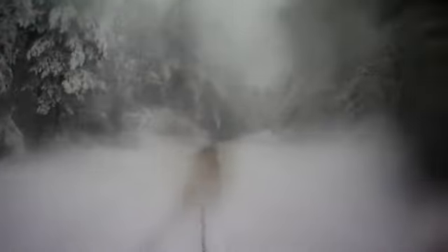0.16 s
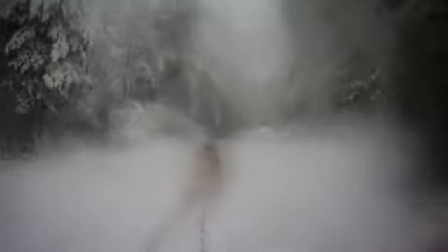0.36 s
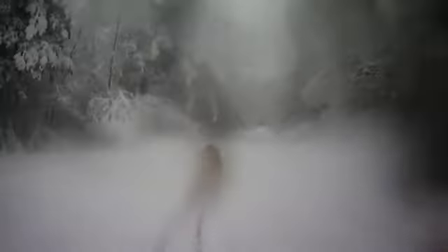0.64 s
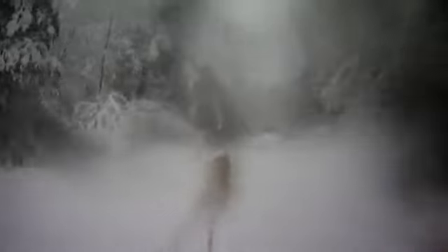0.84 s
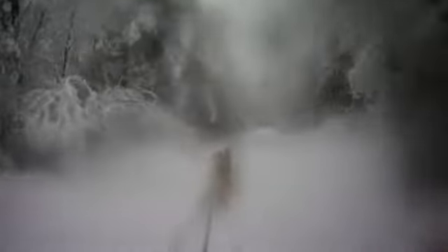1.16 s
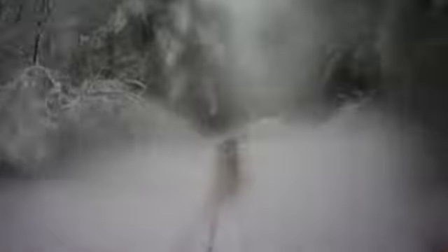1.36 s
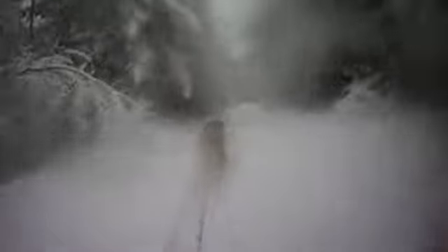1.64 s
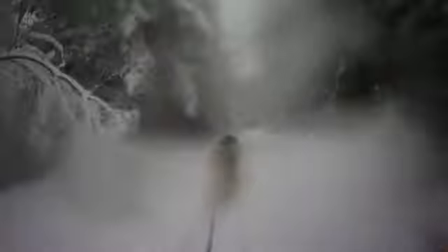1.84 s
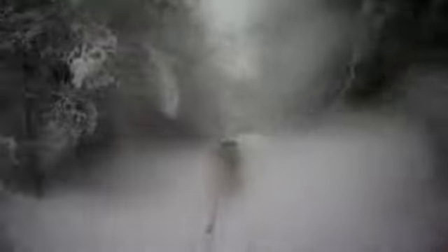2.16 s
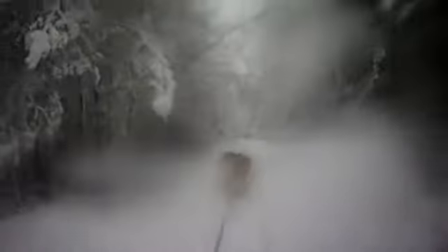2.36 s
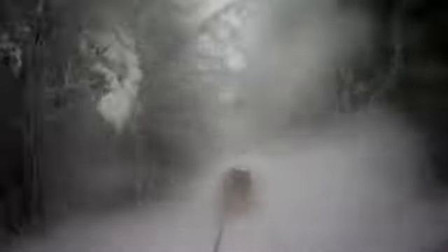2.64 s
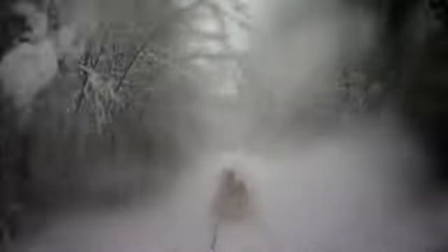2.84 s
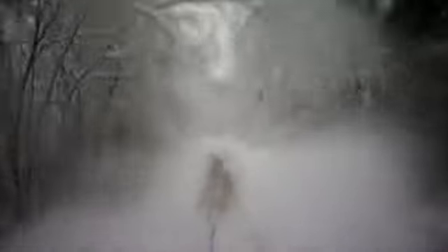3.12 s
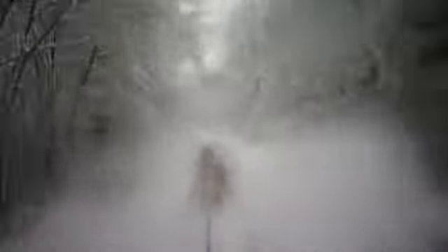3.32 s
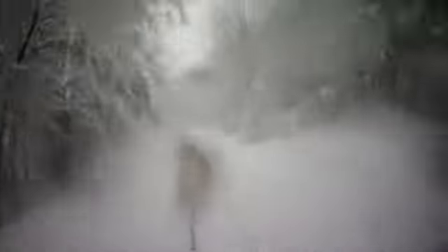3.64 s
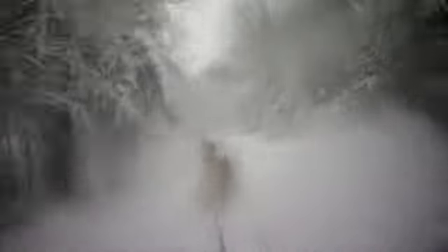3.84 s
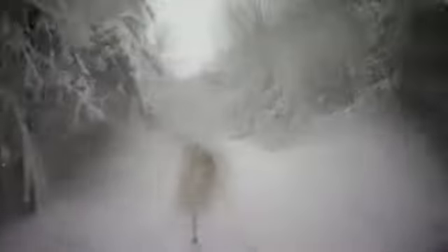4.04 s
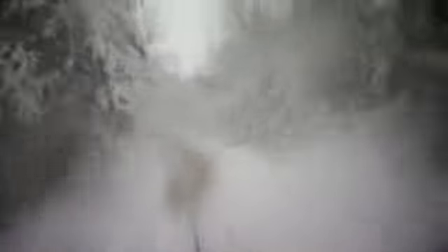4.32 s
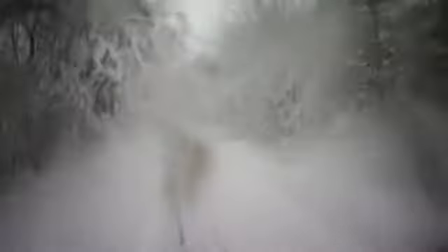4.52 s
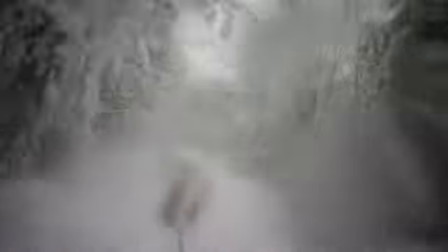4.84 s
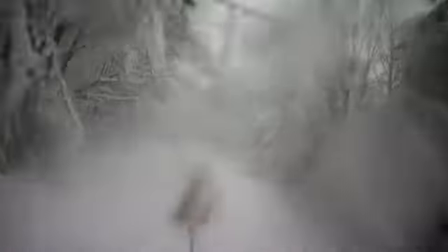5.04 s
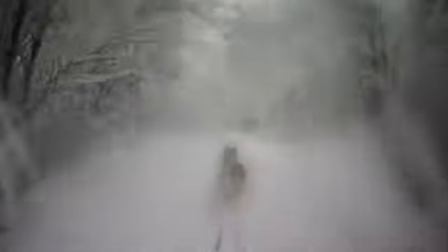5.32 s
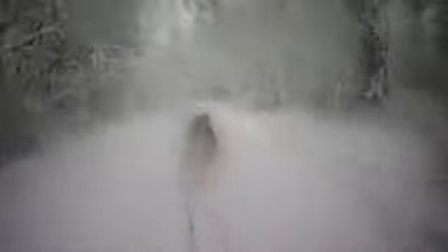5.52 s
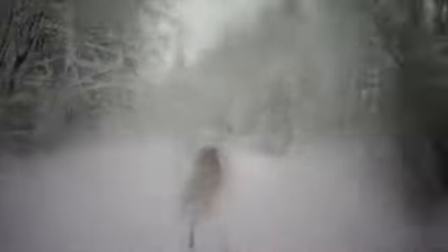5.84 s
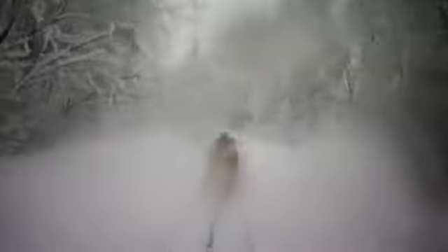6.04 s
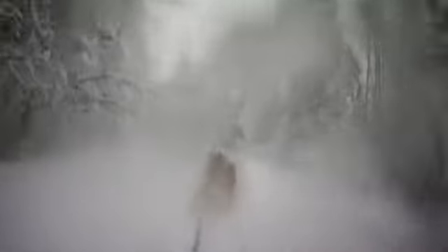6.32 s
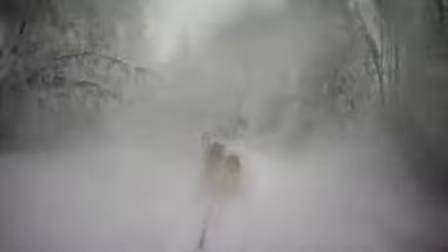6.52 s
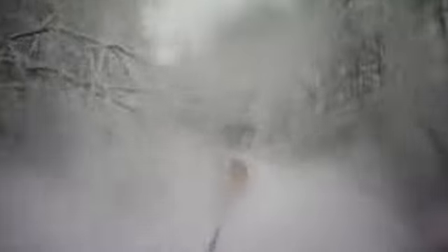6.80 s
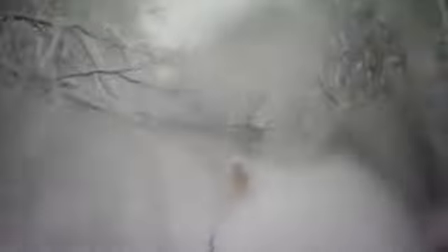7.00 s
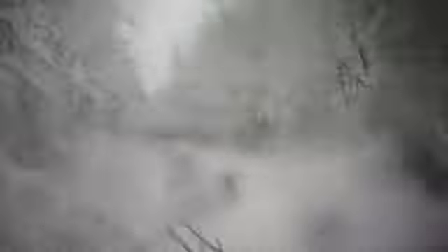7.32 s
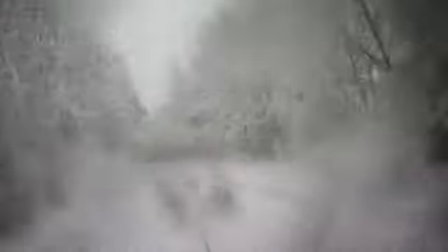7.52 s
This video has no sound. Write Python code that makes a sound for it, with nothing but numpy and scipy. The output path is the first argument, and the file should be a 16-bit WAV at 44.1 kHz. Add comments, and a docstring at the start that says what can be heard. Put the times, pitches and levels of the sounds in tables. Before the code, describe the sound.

A microphone sealed in a small plastic case rides along with a skier through forest powder. The ski hiss is narrow and hollow, rising and dipping with pressure, with deep wind rumble beneath. Irregular bumps bring rapid plastic rattles, low thumps and sprinkles of icy grains, densest around the middle. Near the end branches whip the case with sharp cracks and ringing midrange smacks that clip the microphone, before the hiss resumes.

```python
"""Skiing down a forest trail in deep powder, heard by one microphone inside a camera's plastic housing.
From the start the skis' hiss rings the hollow case, air rumbles past and crystals pepper the wall.
At each bump the case jolts, the mount knocks about 25 times a second and loosened snow ticks on the wall.
From about 3 s soft clumps of snow slap the case with short, damped rings.
Just after 7.2 s snowy twigs whip it: noise cracks and ringing walls that overload the microphone."""
import sys
import numpy as np
from scipy import signal
from scipy.fft import rfft, irfft
from scipy.io import wavfile
from scipy.ndimage import uniform_filter1d

SR = 44100
rng = np.random.default_rng(int(sys.argv[2]) if len(sys.argv) > 2 else 0)


def log_audio(samples):
    """Write samples as a 16-bit WAV file to the path given in sys.argv[1]."""
    # one column per channel
    frames = np.atleast_2d(samples).T
    # limit to full scale, then quantise
    limited = np.clip(frames, -1, 1)
    pcm = np.round(limited * 32767).astype(np.int16)
    wavfile.write(sys.argv[1], SR, pcm)


N = 337792
TIME = np.arange(N) / SR
FREQS = np.fft.rfftfreq(N, 1 / SR)

# Table levels are relative: each source adds its own trim, and some add random scatter.
# How hard the skis press through the powder: (time [s], hiss level [dB])
SKI_PRESSURE = [(0.0, -42), (0.47, -40), (1.43, -44), (1.68, -36.5), (1.82, -40), (2.38, -45), (2.6, -40),
                (2.86, -48), (3.36, -45), (3.5, -40), (3.88, -42.5), (4.07, -33.5), (4.18, -41),
                (4.45, -43), (4.64, -37), (5.05, -47), (5.38, -44), (5.56, -36.5), (5.85, -41.5),
                (6.2, -38), (6.43, -45), (6.52, -38), (6.98, -43), (7.2, -38), (7.66, -40)]
# Air space and walls of the case, driven by the skis: (centre [Hz], nominal width [Hz], level [dB])
CASE_RESONANCES = [(593, 154, -9.5), (954, 195, 0), (1384, 224, -2), (1764, 160, -7), (2056, 167, 2.5),
                   (2880, 290, -15), (3830, 210, -24), (7700, 100, -28)]
# Spectra of the moving air, deep rumble and quicker eddies: (frequency [Hz], density [dB])
RUMBLE_SPECTRUM = [(10, -25), (27, 2), (40, -2), (55, -5), (90, -11), (200, -27), (500, -46)]
BUFFET_SPECTRUM = [(30, -24), (70, 1), (120, -7.5), (200, -5), (320, -12), (700, 1), (2000, -88)]
# Spectra of the spray, its fine crystals, coarse grains and fizz: (frequency [Hz], density [dB])
CRYSTAL_SPECTRUM = [(3000, -23), (7000, -12), (8500, 0), (11000, 8), (14500, -3.5), (16000, -29)]
GRIT_SPECTRUM = [(1500, -11), (3000, -10), (3600, -6), (5100, -2), (6400, -10), (9000, -4), (15000, -9.5)]
FIZZ_SPECTRUM = [(2000, -19.5), (3700, 20), (5000, -6.5), (7300, -23), (7900, 18.5), (9000, -19),
                 (10800, 7.5), (13000, 6.5), (15200, 4.5), (16000, -18.5)]
# Bumps that set the mount rattling: (first knock [s], last knock [s], first knock level [dB],
# last knock level [dB], loosened snow [dB against the knocks])
RATTLING_BUMPS = [(0.022, 0.181, -23, -24, -3), (0.454, 0.487, -26.5, -20, -14),
                  (0.645, 0.645, -30, -30, -10), (0.722, 0.753, -20, -21, -9),
                  (0.792, 0.831, -22.5, -27.5, -9), (0.877, 0.957, -18.5, -20.5, -10),
                  (0.999, 1.118, -23, -30.5, -13), (1.668, 1.710, -22, -22.5, -16),
                  (1.883, 1.949, -33, -29, -14), (2.103, 2.205, -23, -27.5, -11),
                  (2.482, 2.523, -12.5, -14, -12), (2.557, 2.678, -25, -24, -12),
                  (2.744, 2.744, -26, -26, -2), (3.308, 3.308, -32, -32, -1),
                  (3.480, 3.519, -15, -14.5, -7.5), (3.564, 3.643, -14.5, -21, -6),
                  (3.688, 3.800, -18, -29, -2), (3.838, 3.911, -25.5, -26, -11),
                  (3.954, 3.988, -18.5, -25, -10), (4.139, 4.177, -23.5, -21.5, -12),
                  (4.222, 4.257, -17, -18, -10), (4.303, 4.349, -14.5, -14, -7),
                  (4.388, 4.468, -19, -22, -1), (4.513, 4.513, -17, -17, -13),
                  (4.611, 4.685, -17.5, -18.5, -11), (4.732, 4.764, -17.5, -24, -10),
                  (5.146, 5.146, -34, -34, -2), (5.316, 5.316, -29, -29, -7), (5.524, 5.657, -15, -25, -9),
                  (5.939, 5.989, -27.5, -31.5, -10), (6.223, 6.387, -21.5, -21, -3),
                  (6.506, 6.588, -19.5, -20.5, -8), (6.657, 6.733, -20, -30, -10),
                  (6.870, 6.870, -31, -31, -8), (7.173, 7.173, -26, -26, -13),
                  (7.496, 7.496, -23.5, -23.5, 0), (7.653, 7.653, -23.5, -23.5, -9)]
# Strong jolts from the ground: (time [s], level [dB], pitch [Hz])
GROUND_JOLTS = [(0.865, -23, 104), (1.596, -27, 186), (1.641, -25, 110), (3.678, -17, 89),
                (5.495, -15.5, 105), (6.105, -27, 120)]
# What a knock of the mount rings: (nominal pitch [Hz], nominal width [Hz], level [dB])
MOUNT_RESONANCES = [(76, 123, 6), (437, 108, 8.5), (584, 176, 5.5), (950, 77, 11), (1617, 192, 7.5),
                    (1974, 47, 5), (2860, 150, -15.5), (3757, 130, 1), (4110, 220, -11), (4980, 210, -12)]
# Snow loosened by a knock lands in two lots: (mean delay [s], scatter of the delay [s], level [dB])
SNOW_LANDINGS = [(.014, .0014, -2.5), (.028, .004, -12)]
# Single icy grains that hit the case: (time [s], level [dB])
ICY_GRAINS = [(0.501, -21), (0.768, -14), (0.891, -19), (0.968, -18), (1.026, -25), (1.642, -26),
              (1.651, -23.5), (2.462, -24), (2.532, -23), (3.326, -25), (3.471, -24), (3.589, -20.5),
              (3.704, -21), (3.737, -18), (3.856, -25), (3.925, -20.5), (3.964, -24), (4.053, -25),
              (4.270, -17.5), (4.414, -19.5), (4.441, -22), (5.391, -29), (5.558, -24), (5.920, -32),
              (6.233, -24), (6.316, -17.5), (6.333, -22), (6.341, -22), (6.370, -20.5), (6.747, -24)]
# Spectrum of the icy ticks: (frequency [Hz], density [dB])
TICK_SPECTRUM = [(300, -23), (1000, -5.5), (2000, -1.5), (3000, -17), (3600, 1), (5000, -7.5), (6300, -8.5),
                 (8500, 1.5), (11000, 0), (15000, -1.5), (17000, -28.5)]
# Soft clumps of snow that slap the case: (time [s], level [dB], ring pitch [Hz])
SNOW_CLUMPS = [(3.013, -29, 1920), (3.449, -26.5, 1030), (4.067, -24.5, 1950), (4.269, -24, 1750),
               (4.569, -21, 1050), (5.541, -25.5, 1000), (5.551, -31, 1800), (5.631, -31, 1960)]
# Twig strikes: (time [s], ring level [dB], ring pitch [Hz], crack level [dB])
TWIG_STRIKES = [(7.2479, -1, 2000, 2), (7.2737, 9, 1850, 2.5), (7.2920, 8, 2188, 4), (7.3170, 0, 1324, -20),
                (7.3300, -3, 1080, -11), (7.3360, -2, 976, -14), (7.3462, 2, 2050, -9),
                (7.3785, 9, 2086, 7), (7.3880, 2, 1960, -13), (7.4022, 4, 2010, -19),
                (7.4161, 6, 1956, -11), (7.4235, 4, 2000, -11), (7.4348, 7, 1930, -13),
                (7.4589, -15, 1310, -5)]
# Spectrum of the twigs' cracks: (frequency [Hz], density [dB])
CRACK_SPECTRUM = [(300, -19), (1000, 5), (3000, 8), (5300, 4.5), (7000, 2), (9500, 8), (11200, 10.5),
                  (14000, 4.5), (16000, -8)]

# Steady levels while gliding [dB]
GLIDE_RUMBLE_DB, GLIDE_BUFFET_DB, GLIDE_SPRAY_DB = -44, -53, -63.5
AIR_FOLLOWS_HISS = .6  # dB of air noise per dB of ski hiss
# Low noise at a middling knock [dB], and its growth [dB per dB of knock]
SHAKE_RUMBLE_DB, SHAKE_BUFFET_DB, SHAKE_GROWTH = -38, -45, .6
# Pressed this hard the skis throw spray too [dB]; the growth is in dB per dB of hiss
CARVE_HISS_DB, CARVE_SPRAY_DB, CARVE_GROWTH = -35, -53, 4.5
SNOW_SPRAY_DB, TWIG_SPRAY_DB = -25.5, -47.5  # spray against the loosened snow and the twig rings
RATTLE_S = .039  # about one swing of the mount
JOLT_LEAD_S, JOLT_DB, JOLT_HZ = .010, -9, 85  # small jolt before a knock: dB against it, median pitch
LANDING_SCATTER_DB = 2.5
SOONER_S_PER_DB = .0005  # a harder knock flings the snow faster
TWIG_BOUNCE_S, TWIG_BOUNCE_DB = .0058, -8  # a twig springs back and touches once more
TOP_HZ = 15700  # upper edge of the microphone's band


def undb(db):
    """Decibels to gain."""
    return 10 ** (np.asarray(db) / 20)


def power_sum(*levels_db):
    """Level of unrelated sounds together."""
    return 10 * np.log10(sum(undb(db) ** 2 for db in levels_db))


def unit(x):
    """Scale to rms 1."""
    return x / np.sqrt(np.mean(x ** 2))


def unit_energy(x):
    """Scale a short sound to energy 1."""
    return x / np.linalg.norm(x)


def curves(table):
    """Each column of a time table, sample by sample."""
    s, *columns = np.transpose(table)
    return [np.interp(TIME, s, column) for column in columns]


def swell(times, levels_db, hold_s, rise_db_per_s, fall_db_per_s):
    """A level in dB that rises to each event, holds briefly and falls away."""
    coarse = TIME[::64]
    since = coarse - times[:, None]
    before = rise_db_per_s * np.maximum(-since, 0)
    after = fall_db_per_s * np.maximum(since - hold_s, 0)
    return np.interp(TIME, coarse, np.max(levels_db[:, None] - before - after, axis=0))


def walk(rate):
    """Smooth random wandering with spread 1, in about `rate` steps a second."""
    k = int(SR / rate)
    steps = np.repeat(rng.standard_normal(N // k + 1), k)
    smooth = uniform_filter1d(uniform_filter1d(steps, k), k)
    return unit(smooth[:N])


def add(track, s, sound):
    """Mix a short sound in at time s."""
    start = int(np.clip(s * SR, 0, N - 1))
    track[start:start + len(sound)] += sound[:N - start]


def colour(x, points):
    """Causal filter of unit power gain with the given (Hz, dB) shape."""
    hz, db = np.transpose(points)
    gain = unit(undb(np.interp(np.log(FREQS + 1), np.log(hz), db)))
    # Folding the cepstrum onto positive times gives minimum phase
    cepstrum = irfft(np.log(gain), N)
    cepstrum[1:N // 2] *= 2
    cepstrum[N // 2 + 1:] = 0
    return irfft(rfft(x) * np.exp(rfft(cepstrum)), N)


def resonate(x, hz, width):
    """One resonance, gain 1 at its centre."""
    return signal.lfilter(*signal.iirpeak(hz, hz / width, fs=SR), x)


def grains(per_s, spread_db):
    """Random impulses, many weak and a few strong."""
    size = undb(spread_db * np.minimum(rng.exponential(size=N), 4))
    landed = rng.random(N) < per_s / SR
    return unit(landed * size * rng.choice([-1, 1], N))


def burst(t, rise_s, decay_s):
    """A brief crush of noise that swells and dies, with unit energy."""
    envelope = (1 - np.exp(-t / rise_s)) ** 2 * np.exp(-t / decay_s)
    return unit_energy(rng.standard_normal(len(t)) * envelope)


def skis(hiss_db):
    """Powder shears under the skis; the case passes mostly its own resonances, each wavering a little."""
    shear = rng.standard_normal(N) + 1.04 * grains(per_s=1500, spread_db=6.0)
    hollow = np.zeros(N)
    for k, (hz, nominal_width, db) in enumerate(CASE_RESONANCES):
        width = 1.09 * nominal_width
        waver = undb(1.4 * walk(22))
        ringing = resonate(resonate(shear, hz, width), hz, width)
        hollow += (-1) ** k * undb(db) * waver * ringing  # neighbours in opposite polarity
    # A little hiss gets straight through the seams
    leak = resonate(rng.standard_normal(N), 1300, 1500)
    flutter_db = 0.8 * walk(30)
    return (unit(hollow) + undb(-36) * unit(leak)) * undb(hiss_db + 1.2 + flutter_db)


def air(rumble_db, buffet_db):
    """A deep rumble of moving air and quicker low buffeting, both swelling around each knock."""
    rumble = colour(rng.standard_normal(N), RUMBLE_SPECTRUM) * undb(rumble_db - .7)
    gusts = undb(3 * walk(40))
    buffet = colour(rng.standard_normal(N), BUFFET_SPECTRUM) * gusts * undb(buffet_db - 1)
    return rumble + buffet


def crackle(per_s, spread_db, decay_s):
    """Each grain bursts into its own tiny puff of noise."""
    impacts = grains(per_s, spread_db) ** 2 + 1e-12
    energy = signal.lfilter([1], [1, -np.exp(-2 / (decay_s * SR))], impacts)
    return unit(np.sqrt(energy) * rng.standard_normal(N))


def spray(spray_db):
    """Many fine crystals and fewer coarse grains pepper the case over a smooth fizz."""
    fine = colour(crackle(per_s=170, spread_db=5.5, decay_s=.0008), CRYSTAL_SPECTRUM)
    coarse = colour(crackle(per_s=60, spread_db=5, decay_s=.0009), GRIT_SPECTRUM)
    fizz = colour(rng.standard_normal(N), FIZZ_SPECTRUM) * undb(-1.5 + 2.6 * walk(60))
    return (fizz + undb(5) * fine + undb(2.5) * coarse) * undb(spray_db)


def ride(knocks):
    """Hiss, air and spray: air follows the skis and the low end swells around each knock; carving, bumps and
    twigs throw snow."""
    hiss_db, = curves(SKI_PRESSURE)
    knock_s, knock_db, snow_db = knocks.T
    twig_s, twig_db = np.transpose(TWIG_STRIKES)[:2]

    shake_peaks_db = SHAKE_GROWTH * (knock_db - knock_db.mean())
    shake_db = swell(knock_s, shake_peaks_db, hold_s=.02, rise_db_per_s=190, fall_db_per_s=200)
    speed_db = AIR_FOLLOWS_HISS * (hiss_db - hiss_db.mean())
    rumble_db = power_sum(GLIDE_RUMBLE_DB + speed_db, SHAKE_RUMBLE_DB + shake_db)
    buffet_db = power_sum(GLIDE_BUFFET_DB + speed_db, SHAKE_BUFFET_DB + shake_db)

    carve_db = CARVE_SPRAY_DB + CARVE_GROWTH * (hiss_db - CARVE_HISS_DB)
    thrown_db = swell(knock_s, snow_db, hold_s=.02, rise_db_per_s=320, fall_db_per_s=200)
    shed_db = swell(twig_s, twig_db, hold_s=.03, rise_db_per_s=500, fall_db_per_s=130)
    spray_db = power_sum(GLIDE_SPRAY_DB, carve_db, SNOW_SPRAY_DB + thrown_db, TWIG_SPRAY_DB + shed_db)
    return skis(hiss_db) + air(rumble_db, buffet_db) + spray(spray_db)


def knock_series():
    """The mount knocks once a swing for as long as a bump lasts: rows of (s, level dB, snow dB)."""
    rows = []
    for first_s, last_s, first_db, last_db, snow_db in RATTLING_BUMPS:
        swings = round(abs(last_s - first_s) / RATTLE_S)
        series = np.linspace((first_s, first_db), (last_s, last_db), swings + 1)
        rows += [(s, db, db + snow_db) for s, db in series]
    return np.array(rows)


def jolts(knocks):
    """A bump shakes the whole case in a short low pulse, with a small one just before each knock."""
    out, t = np.zeros(N), TIME[:4096]
    shakes = list(GROUND_JOLTS)
    for s, knock_db, _ in knocks:
        hz = JOLT_HZ * np.exp(.3 * rng.standard_normal())
        shakes.append((s - JOLT_LEAD_S, knock_db + JOLT_DB, hz))
    envelope = (1 - np.exp(-t / 0.0029)) * np.exp(-t / 0.0081)
    for s, level_db, hz in shakes:
        add(out, s, np.sin(2 * np.pi * hz * t) * envelope * undb(level_db + 0.5))
    return out


def rattle(knocks):
    """Every knock rings the same short modes; harder knocks are brighter, deader and scuff more."""
    out, t = np.zeros(N), TIME[:2048]
    hz, width, db = np.transpose(MOUNT_RESONANCES)[:, :, None]
    # Plastic on plastic passes little treble
    soft_stop = signal.butter(10, 5450, fs=SR, output="sos")
    scuff_filter = signal.butter(1, 7000, fs=SR, output="sos")
    for s, level_db, _ in knocks:
        force = (level_db + 22) / 10
        detune, scatter = rng.standard_normal((2, len(hz), 1))
        brightness_db = 2.0 * force * np.log2(hz / 1000)
        weight = width * undb(db + 0.94 * scatter + brightness_db)
        damping = np.pi * width * (1 + 1.04 * max(force - .4, 0))
        pitch = hz * (1 + .01 * detune)
        modes = weight * np.exp(-damping * t) * np.cos(2 * np.pi * pitch * t)
        ring = signal.sosfilt(soft_stop, np.sum(modes, axis=0))
        for slow_hz in (1100, 1900):  # all-pass: the mount carries some pitches later than others
            ring = ring - 2 * resonate(ring, slow_hz, 1000)
        scuff = signal.sosfilt(scuff_filter, burst(t, 0.00026, 0.0016))
        knock = (unit_energy(ring) + scuff * undb(-9.5 + 8.4 * force)) * undb(level_db + 24.5)
        add(out, s, knock)
        # It bounces off the opposite stop
        bounce_s = 0.002186 * (1 + 0.05 * rng.standard_normal())
        add(out, s + bounce_s, -undb(-14) * knock)
    return out


def ticks(knocks):
    """Icy grains shatter on the case in about a millisecond; most land after a knock shook them loose."""
    out, t = np.zeros(N), TIME[:1024]
    hits = list(ICY_GRAINS)
    for s, knock_db, snow_db in knocks:
        sooner_s = SOONER_S_PER_DB * (knock_db - knocks[:, 1].mean())
        for delay_s, scatter_s, lot_db in SNOW_LANDINGS:
            late, size = rng.standard_normal(2)
            landing_s = s + delay_s - sooner_s + scatter_s * late
            hits.append((landing_s, snow_db + lot_db + LANDING_SCATTER_DB * size))
    for s, level_db in hits:
        shatter = burst(t, 0.0005, 0.0006) + 0.21 * burst(t, 0.0015, 0.0015)
        add(out, s - .0005, shatter * undb(level_db + 22.5))
    return colour(out, TICK_SPECTRUM)


def clumps():
    """A soft clump spreads its push over a few milliseconds and rings the wall without a crack."""
    out, t = np.zeros(N), TIME[:2048]
    envelope = (1 - np.exp(-t / 0.00081)) * np.exp(-t / 0.0017)
    for s, level_db, hz in SNOW_CLUMPS:
        ring = np.sin(2 * np.pi * hz * t) * envelope
        smear = resonate(resonate(burst(t, 0.00018, 0.0033), 1400, 1300), 1400, 1300)
        add(out, s, (unit_energy(ring) + unit_energy(smear)) * undb(level_db + 22.5))
    return out


def twigs():
    """Each twig cracks on the case, drags, rings its wall and bounces; pitch depends on where it lands."""
    rings, cracks, t = np.zeros(N), np.zeros(N), TIME[:4096]
    envelope = (1 - np.exp(-t / 0.0011)) * np.exp(-t / 0.0029)
    for s, ring_db, hz, crack_db in TWIG_STRIKES:
        wall = np.sin(2 * np.pi * hz * t) * envelope
        # The later twigs land nearer the stiff rim
        rim_db = np.interp(s, [7.335, 7.375], [-20, -9.5])
        for delay_s, touch_db in ((0, 0), (TWIG_BOUNCE_S, TWIG_BOUNCE_DB)):
            rim_hz = 3460 * (1 + 0.025 * rng.standard_normal())
            rim = undb(rim_db) * np.sin(2 * np.pi * rim_hz * t) * np.exp(-t / 0.0026)
            drag = unit_energy(resonate(burst(t, .0006, 0.0041), 1.01 * hz, 0.47 * hz))
            ring = (wall + rim + undb(6) * drag) * undb(ring_db + touch_db + 3.5)
            crack = burst(t, 0.00053, 0.0014) * undb(crack_db + touch_db + 20.0)
            add(rings, s + delay_s, ring)
            add(cracks, s + delay_s, crack)
    return rings + colour(cracks, CRACK_SPECTRUM)


def scene():
    """Everything reaches one microphone inside the case, the same on both channels."""
    knocks = knock_series()
    mono = ride(knocks) + jolts(knocks) + rattle(knocks) + ticks(knocks) + clumps() + twigs()
    return np.array([mono, mono])


def record(dry):
    """The microphone overloads at full scale and the top is cut."""
    clipped = np.clip(dry, -1, 1)
    top_cut = signal.ellip(8, .2, 70, TOP_HZ, fs=SR, output="sos")
    return signal.sosfilt(top_cut, clipped)


dry = scene()
out = record(dry)
log_audio(out)
```